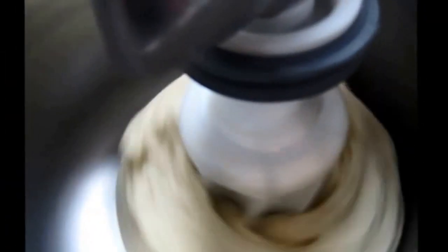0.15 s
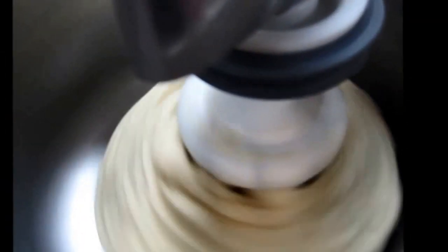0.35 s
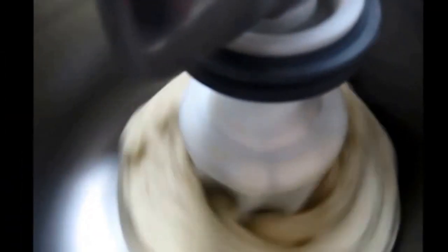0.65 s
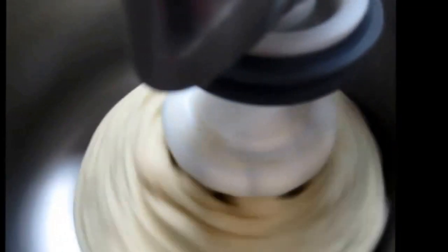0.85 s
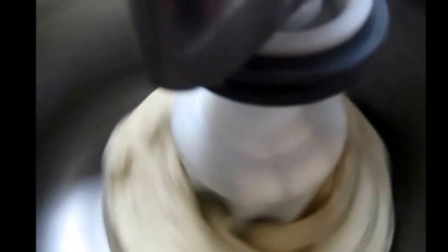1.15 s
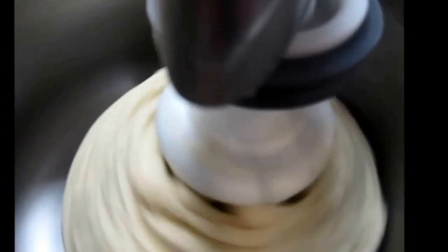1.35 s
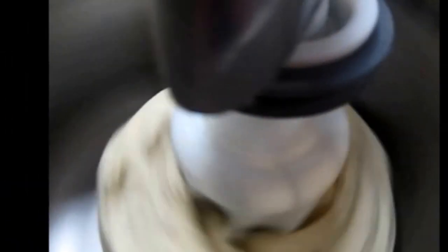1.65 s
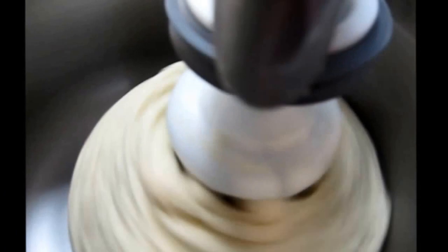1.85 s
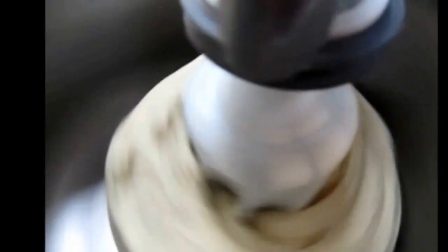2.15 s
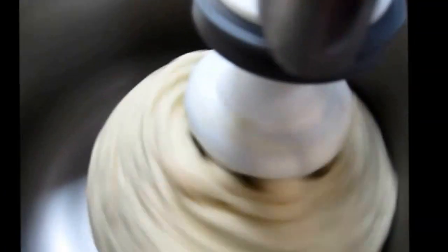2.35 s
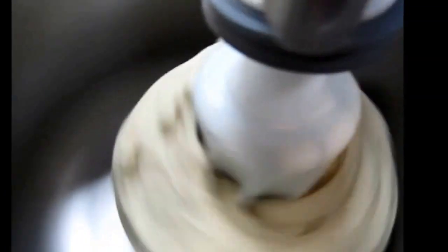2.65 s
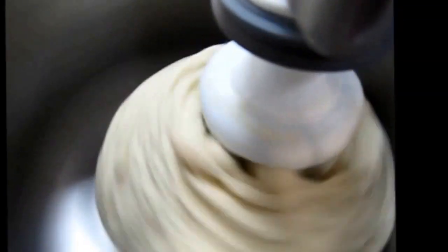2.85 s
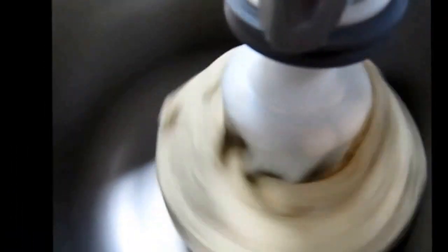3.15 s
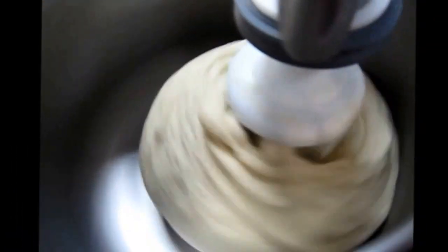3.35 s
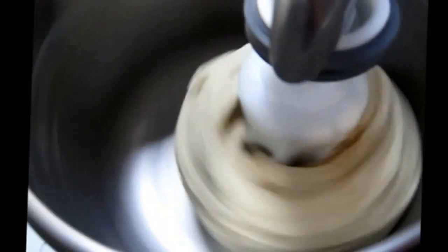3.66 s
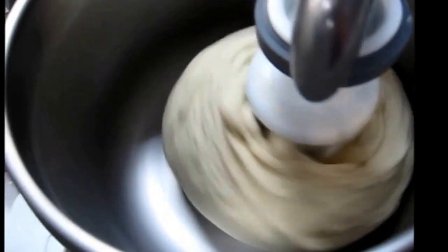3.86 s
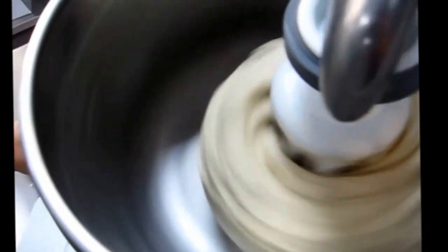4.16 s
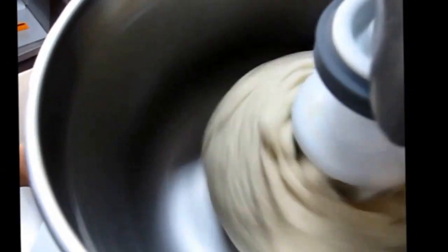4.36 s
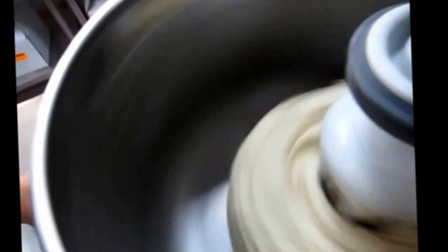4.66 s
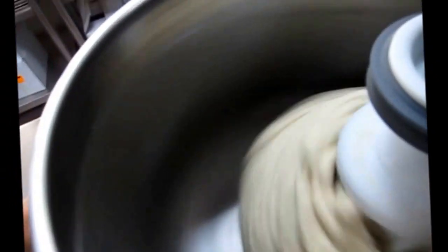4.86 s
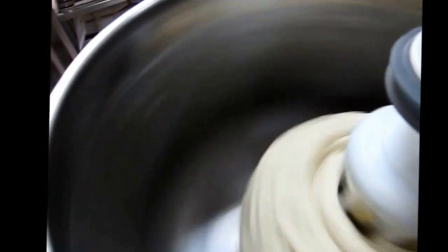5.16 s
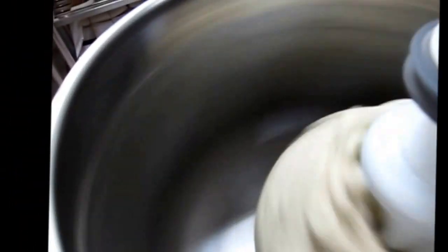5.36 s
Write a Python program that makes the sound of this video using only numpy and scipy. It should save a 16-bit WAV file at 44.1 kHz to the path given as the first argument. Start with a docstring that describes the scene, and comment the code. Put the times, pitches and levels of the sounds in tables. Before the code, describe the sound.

Close indoor kneading machine: low buzzing motor drone, rumble and brush hiss, pulsing with load as a joint chirps rhythmically.

```python
"""A mixer kneads dough indoors, heard from a hand-held stereo microphone close to the bowl.
About twice a second the dough jams and the motor slows by some 3 %: rotor, commutator and two slower shafts are
sums of sines that bend with the speed, a groan dims and a band of noise rattles. A joint squeaks in short tones.
Behind lie shaped noises (casing rumble, brush hiss, cooling air), mains hum and a brief low moan that dips.
The recorder's gain control rides the peaks."""
import sys
import numpy as np
from scipy import signal
from scipy.fft import rfft, irfft, next_fast_len
from scipy.io import wavfile
from scipy.ndimage import uniform_filter1d

SR = 44100
rng = np.random.default_rng(int(sys.argv[2]) if len(sys.argv) > 2 else 0)


def output_pcm(signal):
    """Save a mono or channel-first signal as 16-bit PCM at the path in sys.argv[1].

    Samples are clipped to [-1, 1] before scaling.
    """
    pcm = np.clip(np.atleast_2d(signal).T, -1, 1) * 32767
    wavfile.write(sys.argv[1], SR, np.round(pcm).astype(np.int16))


N = 242991

# cooling air, spectrum: pitch_hz, relative_db
AIR_SPECTRUM = [(5180, -45), (8800, -5.5), (9620, 1.5), (11000, 2), (14000, -6), (15400, -24)]
# slope of the casing's rumble: pitch_hz, relative_db
RUMBLE_SPECTRUM = [(30, -34.5), (100, -27), (150, -28), (260, -15), (450, -19), (700, -22), (1050, -22.5),
                   (1500, -26), (2000, -28), (2350, -25), (2450, -33), (3000, -54)]
# resonances that lift the rumble: centre_hz, width_hz, lift_db
CASING_MODES = [(193, 65, 10), (319, 33.5, 7), (391, 35.4, 13.5), (511.4, 36, 4), (782.3, 39.5, 16.5),
                (1060, 70, 0.5), (1343, 85, 2.5), (1340, 450, 1.5), (1920, 230, 7), (2315, 140, 2)]
# hiss of the brushes, spectrum: pitch_hz, relative_db
HISS_SPECTRUM = [(1500, -46), (2550, -4), (2880, -2.5), (3300, -2.5), (3850, 1), (4370, -3.5), (4890, -3.5),
                 (5420, -7), (6940, -12.5), (7480, -15.5), (7800, -23), (10100, -53), (17200, -120)]
# noise levels over time, the hiss as the microphone moves: time_s, hiss_db, air_db
NOISE_LEVELS = [(0, -38.5, -51.5), (.65, -38, -50.5), (1.1, -39, -53), (1.5, -39, -51), (2, -39, -52),
                (2.45, -39.5, -50.5), (2.75, -39, -50), (3.05, -39.5, -53), (3.3, -38.5, -50),
                (3.9, -39, -52), (4.15, -42, -51), (4.32, -37.5, -51), (4.55, -37.5, -50.5),
                (5.1, -38, -50.5), (5.4, -37.5, -50)]
RUMBLE_DB = -26
AIR_DIP_DB, HISS_RISE_DB = 3.0, 0.1  # per full dip of the groan

# echo off the bowl: time_s, lag_s, level_db
BOWL_ECHO_PATH = [(0, 0.0022, 1), (1.5, 0.0017, -12), (3, 0.0021, -4), (4.4, 0.001786, 2),
                  (5.51, 0.0019, -29)]
ECHO_CUT_HZ = 2800

# brief low tone that dips: time_s, pitch_hz, level_db
MOAN_GLIDE = [(2.8, 143.8, -58), (2.83, 139.3, -35), (2.87, 116, -36), (2.93, 98.94, -40), (2.97, 111, -40),
              (3, 126, -41), (3.03, 138, -60)]

# squeaks of the joint: start_s, peak_db (before a flicker), pitch_hz, hold_s, share_left_after_hold (0-1)
SQUEAK_EVENTS = [(0.223, -14, 761, .023, 0.6), (.733, -9, 774, .024, .9), (1.259, -6, 768, .015, 0.48),
                 (1.781, -9.5, 770, 0.047, 0.21), (2.299, -13, 768, 0.055, 0.52),
                 (2.826, -18.5, 765, .047, 0.63), (2.912, -18.5, 757.5, .016, 0.78),
                 (3.348, -11, 763, .036, 0.51), (3.868, -13, 758.6, .045, .43),
                 (4.393, -9, 763, 0.053, .26), (4.913, -12.5, 762, 0.059, .5), (5.445, -10, 756, .05, 0.34)]
SWELL_S = 0.012

# the dough jams: start_s, length_s, slowing_turns_per_s (before softening), groan_before_db, groan_dip_db,
# rattle_top_db (relative)
DOUGH_JAMS = [(-.146, .18, 6.8, -19, 8, -29), (0.368, 0.18, 6.3, -15, 9, -18.5),
              (0.892, 0.19, 6.3, -16, 8.5, -21), (1.412, 0.18, 6.23, -16, 7, -17.5),
              (1.93, 0.16, 5.6, -16, 7, -21), (2.414, 0.19, 6.1, -16, 7.5, -21),
              (2.933, .217, 6.3, -16, 6.5, -20.5), (3.463, 0.21, 5.73, -17, 7, -27),
              (4.023, .209, 5, -19, 7, -24.5), (4.583, 0.18, 4.76, -16, 7, -22),
              (5.127, 0.21, 4.3, -15, 7, -23), (5.66, .2, 5, -18, 5, -23)]
# the groan slips out of the housing's resonance and climbs back in two steps: after_jam_s, share_of_dip (0-1)
GROAN_DIP_SHAPE = [(-.04, 0.00055), (.06, 0.96), (.14, 0.69), (.24, 0.68), (.33, 0)]
# the rattle swells under load: after_jam_s, relative_to_top_db
RATTLE_SWELL_SHAPE = [(-.17, -18), (-.08, -8), (.04, -3.5), (.15, -7), (.23, -10.5)]
FREE_TURNS_PER_S, TIRING_TURNS_PER_S2 = 159.4, .21
GRIP_S, LET_GO_S = .029, 0.03176  # softness of a jam's start and end
RATTLE_HZ, RATTLE_WIDTH_HZ, RATTLE_FLICKER_DB = 917, 128, 2

# partial levels of rotor, slow shaft and middle shaft, before wavering: fast_db, slowed_db
ROTOR_LEVELS = [(-31, -33), (-35.5, -32), (-42, -50), (-38, -38.5), (-48, -73), (-45.5, -48), (-53, -52.5),
                (-73, -56.5), (-51, -59)]
SLOW_SHAFT_LEVELS = [(-56.5, -60), (-37, -32.5), (-35.5, -41), (-30.5, -30.5), (-38, -35.5), (-38, -39),
                     (-51.5, -57), (-64, -59), (-68, -66)]
MID_SHAFT_LEVELS = [(-37, -39), (-51, -37), (-34.5, -46.5), (-42, -41.5), (-47, -51), (-40.5, -41.5),
                    (-40.5, -44), (-34.5, -39.5), (-40.5, -38), (-42, -43.5), (-44, -37), (-41, -50.5),
                    (-55, -62.5), (-46, -52)]
# the partials they belong to: multiple_of_own_turning_rate
ROTOR_PARTIALS = [1, 2, 4, 8, 11, 13, 18, 20, 25]
SLOW_SHAFT_PARTIALS = [2, 6, 8, 9, 10, 11, 12, 15, 16]
MID_SHAFT_PARTIALS = [3, 4, 7, 8, 12, 13, 14, 15, 16, 17, 18, 19, 22, 23]
SLOW_RATIO, MID_RATIO = .2363, .3217  # shaft turns per rotor turn
GROAN_MULTIPLE, RATTLE_MULTIPLE = 5, 6  # of the slow shaft, of the rotor
# commutator whine split by the magnetic pull, and mains hum, levels before wavering: fast_db, slowed_db
COMMUTATOR_LEVELS = [(-48, -52), (-36, -40), (-42, -41), (-41, -43), (-52, -50)]
HUM_LEVELS = [(-53.5, -51), (-26.5, -26.5)]
# pull-rate steps above the bar rate, and hum partials: multiple_of_pull_rate
COMMUTATOR_STEPS = [0, 1, 2, 3, 4]
HUM_PARTIALS = [1, 2]
BARS, PULL_HZ = 12, 120  # bars a rotor turn
FAST_HZ, SLOWED_HZ = 158.5, 155  # rotor speeds at which the two levels hold

# sameness of the two ports: pitch_hz, likeness (0-1)
PORT_LIKENESS = [(60, .97), (300, .99), (700, .95), (1400, .83), (2500, .66), (4400, .33), (6500, .33),
                 (12000, .3)]
# balance of the ports: pitch_hz, left_minus_right_db
PORT_BALANCE = [(30, .5), (60, 1), (150, 1.7), (380, 1.5), (700, .5), (1290, -1), (2380, 0), (4400, 2.5),
                (8120, .8), (15000, 1)]
# delay between the ports: pitch_hz, left_behind_right_s
PORT_LAG = [(1500, 0), (2200, .00004), (4000, .00004), (5500, .00008), (12000, .00008)]
# the microphone turns away: time_s, extra_left_minus_right_db
MICROPHONE_TURN = [(0, 0.6), (3, 0.5), (5.51, -0.25)]
LIMIT_DB, LIMIT_WINDOW_S, RECOVERY_DB_PER_S = -12.5, 0.018, 3.5
REST_GAIN_DB = 0.7  # gain while nothing is loud
NOTCH_LOW_HZ, NOTCH_HIGH_HZ, CUTOFF_HZ = 8000, 8430, 15600


def amp(db):
    """dB to gain."""
    return 10 ** (np.asarray(db) / 20)


def rms_one(x):
    """Scale to rms 1."""
    return x / np.sqrt(np.mean(x ** 2) + 1e-20)


def in_time(rows):
    """Columns of a curve table, one value a sample."""
    s, *columns = np.transpose(rows)
    return [np.interp(np.arange(N) / SR, s, column) for column in columns]


def at_hz(points, hz):
    """Read a table on a log-frequency axis."""
    pitch_hz, value = np.transpose(points)
    return np.interp(np.log(hz), np.log(pitch_hz), value)


def drift(rate_hz):
    """Smooth random wander of rms 1: noise, one value in 40 samples, through a double-pole low-pass."""
    pole = np.exp(-80 * np.pi * rate_hz / SR)
    noise = rng.standard_normal(N // 40 + 2002)
    slow = rms_one(signal.lfilter([1], [1, -2 * pole, pole * pole], noise)[2000:])
    return np.interp(np.arange(N) / 40, np.arange(len(slow)), slow)


def spectrum_axis(size):
    """Frequencies of a real spectrum, held at 1 Hz or more for the logarithm."""
    return np.maximum(np.arange(size // 2 + 1) * SR / size, 1)


def coloured(gain_at):
    """Two unrelated noises with one colour, rms 1: what both ports share, and what differs."""
    size = next_fast_len(N)
    spectrum = rfft(rng.standard_normal((2, size))) * gain_at(spectrum_axis(size))
    return rms_one(irfft(spectrum, size)[:, :N])


def resonance(hz, centre_hz, width_hz):
    """A flat-topped bump of height 1."""
    return 1 / (1 + (2 * (hz - centre_hz) / width_hz) ** 4)


def cooling_air(air_db, dimmed):
    """High airy noise that flickers and sinks as the jams slow the motor."""
    level_db = air_db - AIR_DIP_DB * dimmed + 0.83 * drift(150)
    return coloured(lambda hz: amp(at_hz(AIR_SPECTRUM, hz))) * amp(level_db)


def casing_rumble(near):
    """Broad noise lifted by the casing's resonances."""
    def colour(hz):
        lift_db = sum(db * resonance(hz, mode_hz, width) for mode_hz, width, db in CASING_MODES)
        return amp(at_hz(RUMBLE_SPECTRUM, hz) + lift_db)
    return amp(RUMBLE_DB) * near * coloured(colour)


def with_bowl_echo(x):
    """A short dull echo off the bowl combs the sound; the comb slides as the microphone moves."""
    lag_s, echo_db = in_time(BOWL_ECHO_PATH)
    dull = signal.sosfilt(signal.butter(2, ECHO_CUT_HZ, fs=SR, output="sos"), x)
    late = [np.interp(np.arange(N) - lag_s * SR, np.arange(N), channel) for channel in dull]
    return x + amp(echo_db) * np.array(late)


def brush_hiss(hiss_db):
    """Hissing noise of the brushes, combed by its echo off the bowl."""
    hiss = coloured(lambda hz: amp(at_hz(HISS_SPECTRUM, hz)))
    return with_bowl_echo(hiss) * amp(hiss_db + 0.67 * drift(75))


def moan():
    """A sine, faint at first, comes in quickly, then slowly fades while it glides down and back, and stops."""
    hz, level_db = in_time(MOAN_GLIDE)
    sounding = level_db > -59.5
    return np.sqrt(2) * amp(level_db) * sounding * np.sin(2 * np.pi * np.cumsum(hz) / SR)


def squeaks():
    """Stick and slip lock to one resonance for a moment: swell, sinking hold, quick end."""
    t, out, unsteady = np.arange(N) / SR, np.zeros(N), 0.29 * drift(30)
    for start, peak_db, hz, hold, left in SQUEAK_EVENTS:
        span = slice(round(start * SR), round((start + .15) * SR))
        since = t[span] - start
        corners_s = np.cumsum([0, SWELL_S, hold, .009, .04])
        shape = np.interp(since, corners_s, [0, 1, left, 0.32 * left, 0])
        out[span] += amp(peak_db) * shape * np.sin(2 * np.pi * hz * since + unsteady[span])
    return out * amp(1.6 * drift(29))


def drive_rattle(rattle_db):
    """The drive rattles under load: noise in one narrow resonance."""
    return amp(rattle_db - 7.5) * coloured(lambda hz: resonance(hz, RATTLE_HZ, RATTLE_WIDTH_HZ))


def motor_under_load():
    """Each jam slows the rotor, dims the groan and sets the drive rattling."""
    t = np.arange(N) / SR
    speed_hz = FREE_TURNS_PER_S - TIRING_TURNS_PER_S2 * t
    dimmed, dip_db, rattle = np.zeros(N), np.zeros(N), np.zeros(N)
    for start, length, slowing, _, jam_dip_db, top_db in DOUGH_JAMS:
        since = t - start
        grip = 1 / (1 + np.exp(-since / GRIP_S)) / (1 + np.exp((since - length) / LET_GO_S))
        speed_hz = speed_hz - slowing * grip
        share = np.interp(since, *np.transpose(GROAN_DIP_SHAPE))
        dimmed += share
        dip_db += jam_dip_db * share
        swell_db = np.interp(since, *np.transpose(RATTLE_SWELL_SHAPE), left=-99, right=-99)
        rattle = np.maximum(rattle, amp(top_db + swell_db))
    rattle_db = 20 * np.log10(rattle + amp(-39)) + RATTLE_FLICKER_DB * drift(10.4)
    start_s, _, _, before_db, _, _ = np.transpose(DOUGH_JAMS)
    return speed_hz, np.interp(t, start_s, before_db) - dip_db, rattle_db, dimmed


def partials(multiples, levels, turns, slowed, offset=0, waver_db=1.5, waver_rad=0.32):
    """Wavering sines on whole multiples of a running count of turns; level follows the load."""
    out = np.zeros(N)
    for multiple, (fast_db, slowed_db) in zip(multiples, levels):
        phase = 2 * np.pi * (multiple * turns + offset + rng.random()) + waver_rad * drift(3.2)
        level_db = fast_db + (slowed_db - fast_db) * slowed + waver_db * drift(6.9)
        out += np.sqrt(2) * amp(level_db) * np.sin(phase)
    return out


def motor_lines(speed_hz, groan_db, rattle_db, near):
    """Turning parts sing at multiples of their rates; the magnetic pull hums and splits the whine."""
    turns, pulls = np.cumsum(speed_hz) / SR, PULL_HZ * np.arange(N) / SR
    slowed = np.clip((FAST_HZ - speed_hz) / (FAST_HZ - SLOWED_HZ), 0, 1.3)
    shafts = partials(SLOW_SHAFT_PARTIALS, SLOW_SHAFT_LEVELS, SLOW_RATIO * turns, slowed)
    shafts += partials(MID_SHAFT_PARTIALS, MID_SHAFT_LEVELS, MID_RATIO * turns, slowed)
    whine = partials(COMMUTATOR_STEPS, COMMUTATOR_LEVELS, pulls, slowed,
                     offset=BARS * turns, waver_db=1.0, waver_rad=0.079)
    hum = partials(HUM_PARTIALS, HUM_LEVELS, pulls, slowed, waver_db=0.97, waver_rad=0.063)
    groan = np.sin(2 * np.pi * GROAN_MULTIPLE * SLOW_RATIO * turns + 0.071 * drift(2.1))
    groan *= np.sqrt(2) * amp(groan_db + .8 * drift(20))
    # under load one rotor partial sings through the rattle's resonance
    song = np.sin(2 * np.pi * RATTLE_MULTIPLE * turns + 0.41 * drift(28))
    song *= amp(rattle_db - 4.0 + 1.03 * drift(15))
    rotor = partials(ROTOR_PARTIALS, ROTOR_LEVELS, turns, slowed, waver_db=2.5, waver_rad=0.51)
    return near * (rotor + shafts + whine + hum) + groan + song


def microphone_ports(shared, differing):
    """Two microphone ports: likeness, balance and lag change with pitch."""
    size = next_fast_len(N + 512)
    hz = spectrum_axis(size)
    alike = np.clip(at_hz(PORT_LIKENESS, hz), 0, 1)
    mid = rfft(shared, size) * np.sqrt(1 + alike)
    side = rfft(differing, size) * np.sqrt(1 - alike)
    tilt = amp(at_hz(PORT_BALANCE, hz) / 2) * np.exp(-1j * np.pi * hz * at_hz(PORT_LAG, hz))
    return irfft([(mid + side) * tilt, (mid - side) / tilt], size)[:, :N] / np.sqrt(2)


def gain_control(x):
    """Loud moments pull the recorder's gain down at once; it creeps back slowly."""
    power = uniform_filter1d(np.mean(x ** 2, axis=0), max(round(LIMIT_WINDOW_S * SR), 1))
    over_db = np.maximum(10 * np.log10(power + 1e-12) - LIMIT_DB, 0)
    creep_db = RECOVERY_DB_PER_S * np.arange(N) / SR
    return x * amp(REST_GAIN_DB + creep_db - np.maximum.accumulate(over_db + creep_db))


def scene():
    """Noises and lines around the bowl, spread between the two ports."""
    speed_hz, groan_db, rattle_db, dimmed = motor_under_load()
    hiss_db, air_db = in_time(NOISE_LEVELS)
    hiss_db = hiss_db + HISS_RISE_DB * dimmed
    near = amp(hiss_db - np.mean(hiss_db))  # rumble and motor lines follow the level of the hiss
    noise = cooling_air(air_db, dimmed) + casing_rumble(near) + brush_hiss(hiss_db) + drive_rattle(rattle_db)
    lines = moan() + squeaks() + motor_lines(speed_hz, groan_db, rattle_db, near)
    # a sideways reflection, 400 samples late, carries the lines into the difference
    reflected = amp(-6.5) * np.pad(lines, (400, 0))[:N]
    turn_db = in_time(MICROPHONE_TURN)[0]
    return microphone_ports(noise[0] + lines, noise[1] + reflected) * amp([turn_db / 2, -turn_db / 2])


def record(dry):
    """The gain rides the peaks; a narrow band near 8 kHz is missing; the top is cut."""
    notch = signal.cheby2(6, 50, [NOTCH_LOW_HZ, NOTCH_HIGH_HZ], "bandstop", fs=SR, output="sos")
    top_cut = signal.cheby2(20, 60, CUTOFF_HZ, fs=SR, output="sos")
    return signal.sosfilt(top_cut, signal.sosfilt(notch, gain_control(dry)))


dry = scene()
out = record(dry)
output_pcm(out)
```